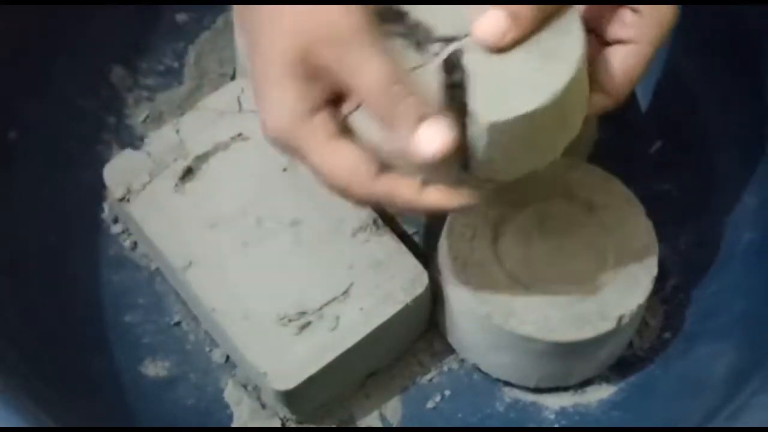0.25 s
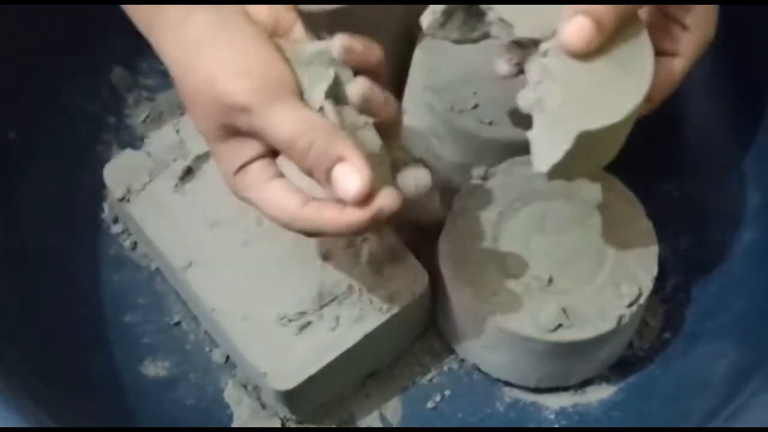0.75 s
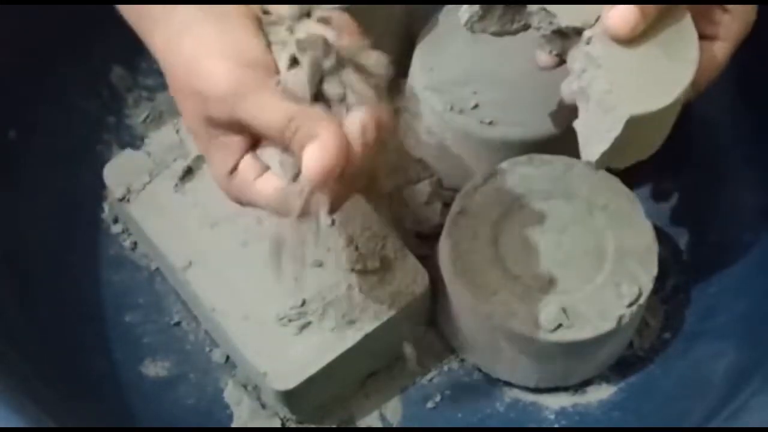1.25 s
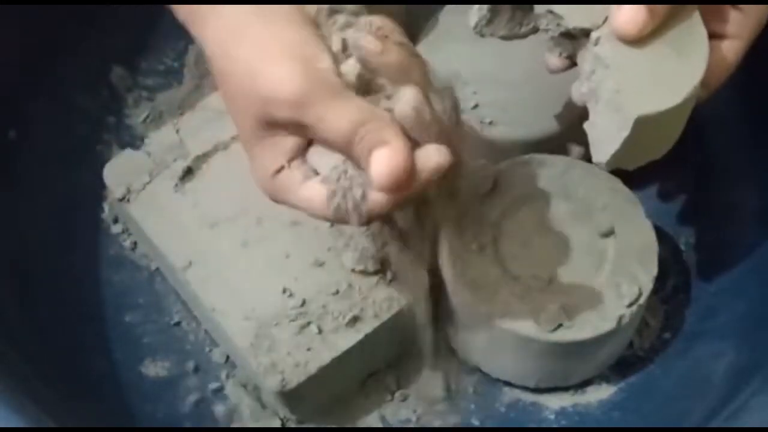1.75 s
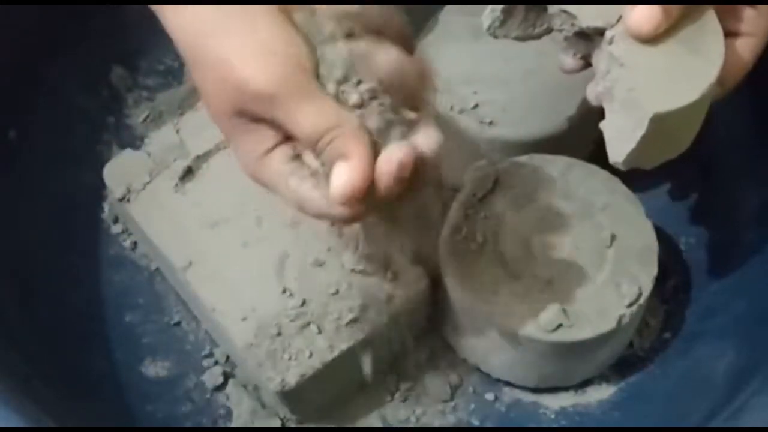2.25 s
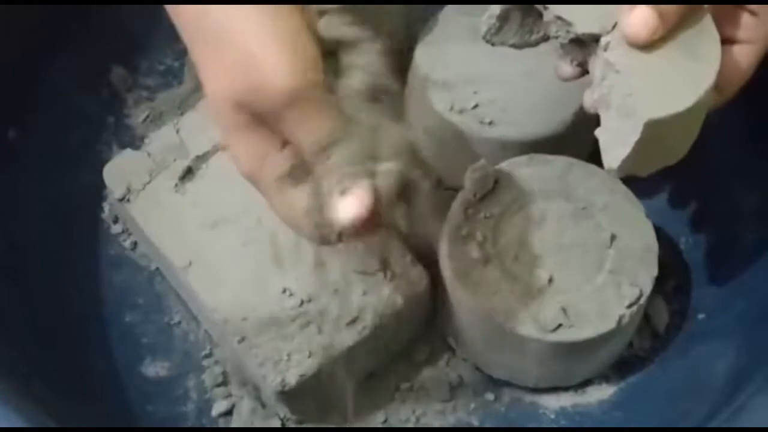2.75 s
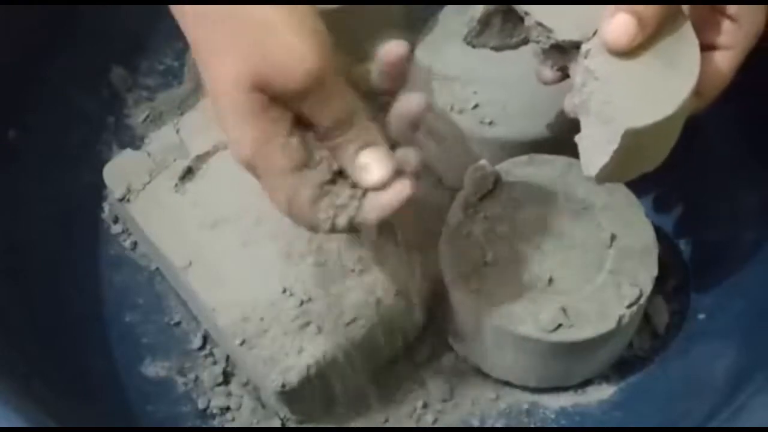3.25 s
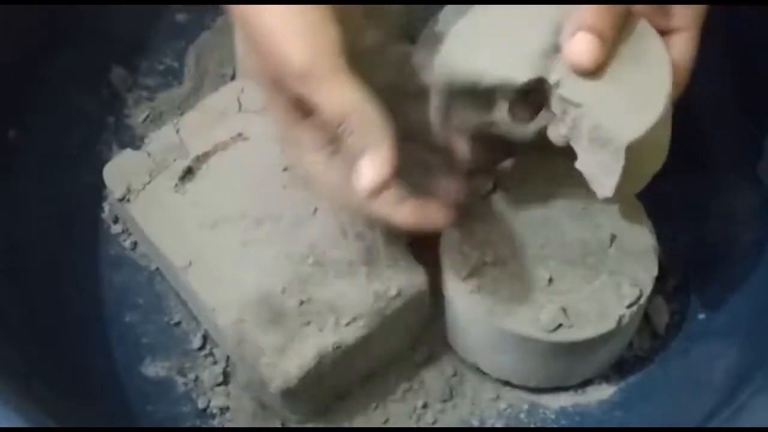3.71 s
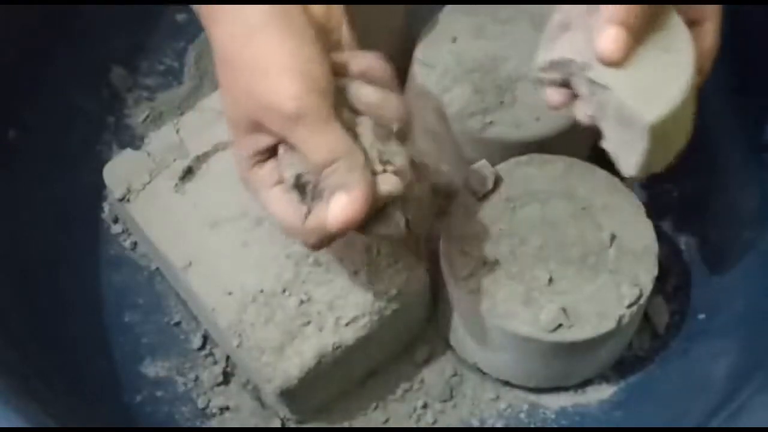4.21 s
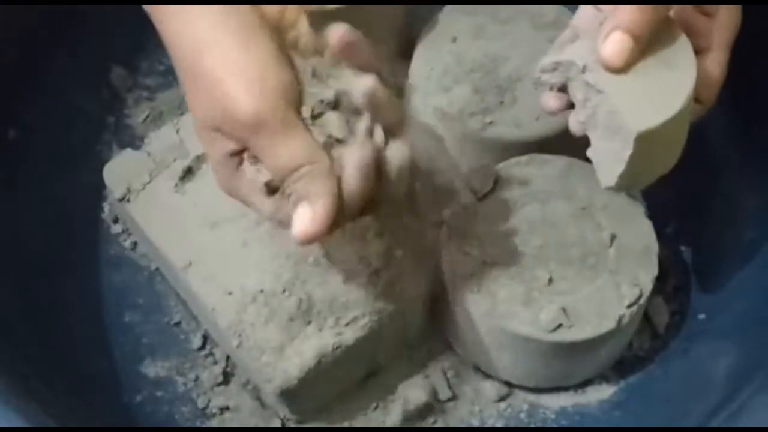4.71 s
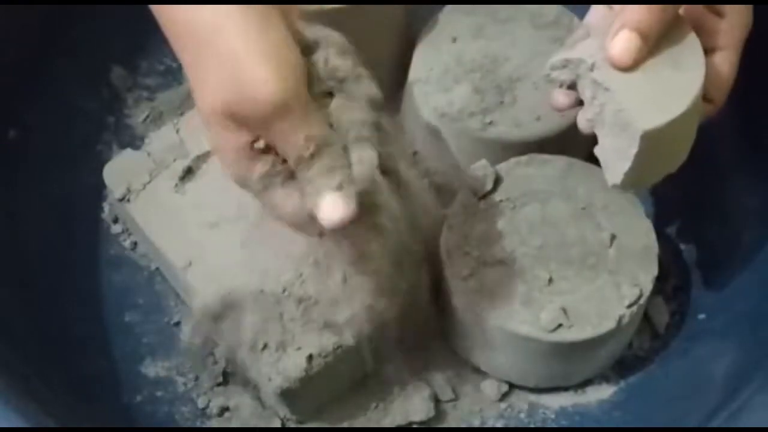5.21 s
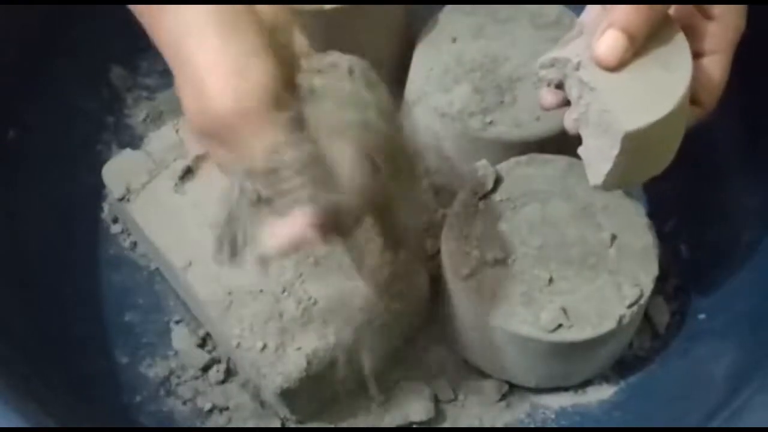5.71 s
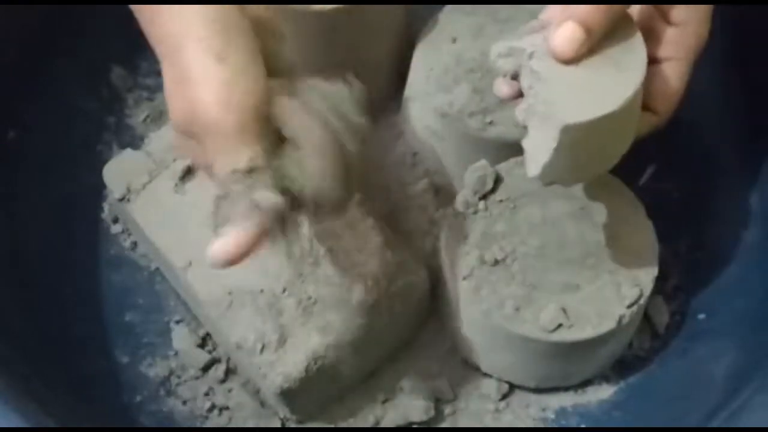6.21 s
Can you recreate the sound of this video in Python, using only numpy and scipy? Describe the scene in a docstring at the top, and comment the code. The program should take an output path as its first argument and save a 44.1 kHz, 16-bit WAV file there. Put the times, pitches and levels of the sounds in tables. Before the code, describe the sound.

Dry, brittle cement crumbles between fingers: short dull snaps, grainy crunches, brief finger rasps and a fine patter of grit. One heavy chunk booms against the tub early on; the strongest crushing follows around two and three seconds, with another burst past five. Heard close, hollow from the tub walls, with a diffuse room tail over soft rumble, wavering hum and faint hiss.

```python
"""Crushing soft cement over a tub

A hand breaks a piece off a soft cement block and crushes it over a plastic tub in a bare, echoing room.
Cracks are damped noise bursts, lumps and the tub's knock are decaying sines, and grit is random clicks.
Short echoes place the cracking between the tub's close walls; a diffuse tail gives the distance of the room.
The microphone also hears the room's low rumble, a wavering hum and a faint hiss."""
import sys
import numpy as np
from scipy import signal
from scipy.fft import rfft, irfft, next_fast_len
from scipy.io import wavfile

SR = 44100
rng = np.random.default_rng(int(sys.argv[2]) if len(sys.argv) > 2 else 0)


def persist_wave(psi):
    """Save psi, clipped to +-1, as 16-bit WAV."""
    counts = np.round(np.clip(psi, -1, 1) * 32767).astype(np.int16)
    wavfile.write(sys.argv[1], SR, np.atleast_2d(counts).T)


N = 284918
TIME = np.arange(N) / SR


def from_db(db):
    """Decibels to gain."""
    return 10 ** (np.asarray(db) / 20)


def rms_one(x):
    """Scale to unit rms."""
    return x / np.sqrt(np.mean(x ** 2) + 1e-20)


def at_hz(points, hz):
    """Read a table of values against frequency on a log-frequency axis."""
    freqs, values = np.transpose(points)
    return np.interp(np.log(np.maximum(hz, 1)), np.log(freqs), values)


def colour(x, spectrum):
    """Give a noise its spectrum; rms 1."""
    size = next_fast_len(N)
    gain = from_db(at_hz(spectrum, np.fft.rfftfreq(size, 1 / SR)))
    shaped = irfft(rfft(x, size) * gain, size)
    return rms_one(shaped[:N])


def band(x, hz, octaves):
    """A band-pass resonance, the more damped the wider it is."""
    half = 2 ** (octaves / 2)
    edges = [hz / half, min(hz * half, SR / 2 - 1000)]
    return signal.sosfilt(signal.butter(2, edges, "band", fs=SR, output="sos"), x)


def add(out, s, sound):
    """Mix a sound in at time s."""
    start = round(s * SR)
    out[start:start + len(sound)] += sound[:N - start]


def grains(per_s, spread_db, size):
    """Random clicks: many small, a few large."""
    born = rng.random(size) < per_s / SR
    sign = rng.choice([-1, 1], size)
    return born * sign * from_db(spread_db * np.minimum(rng.exponential(1, size), 4))


def grit_ticks(per_s, spread_db):
    """Single grains strike the blocks, each at one of five pitches; rms 1."""
    pitches = np.geomspace(1400, 3900, 5)
    return rms_one(sum(band(grains(per_s / 5, spread_db, N), hz, 0.55) for hz in pitches))


def fracture(hz, octaves, splinter, run_s, finer=1.19):
    """A snap, then a dying run of small breaks at finer times its pitch; rms 1 when spread over 5 ms."""
    t = TIME[:SR // 25]
    run = splinter * rms_one(grains(3000, 3.3, len(t))) * np.exp(-t / run_s)
    snap = band(signal.unit_impulse(len(t)), hz, octaves)
    burst = snap + band(run, hz * finer, octaves)
    return burst / np.sqrt(np.sum(burst ** 2) / (SR / 200))


def ring(hz, db, t60, contact_s):
    """A damped mode, swelling over the time the contact lasts."""
    t = TIME[:SR // 4]
    swell = 1 - np.exp(-t / contact_s)
    return from_db(db - 60 * t / t60) * np.sin(2 * np.pi * hz * t) * swell


# low noise of the room: (frequency [Hz], relative density [dB per Hz])
RUMBLE_SPECTRUM = [(20, -26), (45, -28), (72, -31.5), (90, -5), (170, -1.5), (350, -7.5), (480, -6.5),
                   (580, -16.5), (750, -12), (1200, -22.5), (3000, -54.5)]
# faint hiss: (frequency [Hz], relative density [dB per Hz])
HISS_SPECTRUM = [(3000, -7), (7500, 0), (11300, -9.5), (11900, 8.5), (15500, 3.5)]


def background(rumble_db=-51, hum_db=-61, hum_hz=74, hiss_db=-83):
    """Shaped noise for rumble and hiss; a narrow band of noise makes the hum waver."""
    rumble, hum, hiss = rng.standard_normal((3, N))
    low_noise = from_db(rumble_db) * colour(rumble, RUMBLE_SPECTRUM)
    wavering_hum = from_db(hum_db) * rms_one(band(hum, hum_hz, 0.25))
    return low_noise + wavering_hum + from_db(hiss_db) * colour(hiss, HISS_SPECTRUM)


# the hand's effort, before the shares and trims below:
# (time [s], level of the crunch [dB], level of the sand it frees [dB])
HAND_EFFORT = [(0.0, -66, -63), (0.36, -65, -59.5), (0.75, -58, -60.5), (1.06, -62, -60), (1.35, -61, -61),
               (1.69, -48, -54), (1.76, -48, -60), (2.09, -58, -60.5), (2.43, -61, -59), (2.73, -54, -62.5),
               (2.82, -52.5, -54), (3.07, -54.5, -58), (3.42, -61, -58), (4.03, -66, -61.5),
               (4.68, -62, -59.5), (5.2, -62, -59.5), (5.36, -52, -57), (5.52, -59, -60.5),
               (5.76, -60, -61.5), (5.99, -61, -59), (6.24, -64, -60.5), (6.46, -65, -60)]
# crumbs between the fingers: (frequency [Hz], relative density [dB per Hz])
CRUNCH_SPECTRUM = [(100, 6), (200, 11), (450, 18), (700, 16.5), (1100, -0.5), (2000, 9), (2700, -14),
                   (5000, -45.5)]
# sand running off: (frequency [Hz], relative density [dB per Hz])
SAND_SPECTRUM = [(1000, 1), (2300, -1.5), (3000, 4.5), (3900, 8.5), (4700, -4), (5300, -10), (6500, -2),
                 (9000, -29.5)]
CRUNCH_FOLLOWS = .7   # share of the effort's dB swing that reaches the crumbs


def trickle(crunch_db=4.0, sand_db=0, tick_db=-9):
    """Crumbs grind between the fingers, sand runs off and single grains tick; more flow brings more grains."""
    s, effort_db, flow_db = np.transpose(HAND_EFFORT)
    crunch_curve_db = effort_db.mean() + CRUNCH_FOLLOWS * (effort_db - effort_db.mean())
    crunch = from_db(np.interp(TIME, s, crunch_curve_db))
    sand = from_db(np.interp(TIME, s, flow_db))
    crumbs = colour(grains(900 * rms_one(crunch), 3.1, N), CRUNCH_SPECTRUM)
    dust = colour(grains(3500 * rms_one(sand), 1.5, N), SAND_SPECTRUM)
    ticks = grit_ticks(50 * rms_one(sand), spread_db=4.5)
    return from_db(crunch_db) * crunch * crumbs + sand * (from_db(sand_db) * dust + from_db(tick_db) * ticks)


CHIPS_PER_S = 20   # rate at the rms effort
CHIP_DB, CHIP_SPREAD_DB = 7.5, 3   # level above the mean effort, and its random spread
CHIP_LOW_HZ, CHIP_HIGH_HZ, CHIP_OCTAVES = 1380, 3400, 1.56   # range of pitch, and width
CHIP_FOLLOWS = 0.74   # share of the effort's dB swing that reaches their level


def chips():
    """Small pieces snap at random, more often and louder the harder the hand kneads."""
    times, crunch_db, _ = np.transpose(HAND_EFFORT)
    effort_db = np.interp(TIME, times, crunch_db)
    size_db = effort_db.mean() + CHIP_DB + CHIP_FOLLOWS * (effort_db - effort_db.mean())
    due = np.cumsum(CHIPS_PER_S * rms_one(from_db(effort_db))) / SR   # chips expected so far
    out = np.zeros(N)
    for k in range(int(due[-1])):
        at = np.searchsorted(due, k + rng.random())
        db = size_db[at] + CHIP_SPREAD_DB * rng.standard_normal()
        hz = rng.uniform(CHIP_LOW_HZ, CHIP_HIGH_HZ)
        add(out, at / SR, from_db(db) * fracture(hz, CHIP_OCTAVES, splinter=0.092, run_s=0.0022))
    return out


# fingers rasping over crumbs: (time of the peak [s], level [dB], half length [s])
FINGER_RASPS = [(0.121, -55, 0.02), (2.642, -46, .03), (3.413, -49, 0.017), (3.565, -56.5, 0.058),
                (3.762, -52.5, 0.037), (4.216, -53, .022), (5.928, -50, 0.021), (6.09, -48, 0.0081)]
RASP_HZ = 2940


def rasps(level_db=0):
    """A slipping finger drags a short swell of uneven grains."""
    out = np.zeros(N)
    for s, db, half_s in FINGER_RASPS:
        swell = np.hanning(max(round(2 * half_s * SR), 10))
        grit = rms_one(band(grains(1500, 3.5, len(swell)), RASP_HZ, octaves=1.5))
        add(out, s - half_s, from_db(db + level_db) * swell * grit)
    return out


# cement cracking in the fist, levels before the trims in cracks() and width before its lower limit:
# (time [s], body level [dB], body centre [Hz], body width [octaves], gritty edge level [dB])
CEMENT_CRACKS = [(0.376, -41.5, 420.0, 2.4, -41), (0.4446, -38.5, 629, 1.0, -49.5),
                 (0.4553, -44, 620.0, 0.7, -60.5), (0.4884, -37, 738, 0.9, -60.5),
                 (0.6254, -28.5, 420.0, 1.66, -54.5), (0.648, -45.5, 920.0, 3.1, -43),
                 (0.7151, -33.0, 650.0, 0.92, -57.5), (0.7499, -42.5, 2300.0, 1.6, -38),
                 (1.2611, -28.5, 604, 1.38, -57.5), (1.3906, -36.5, 1420.0, 0.9, -48),
                 (1.4202, -40.5, 740.0, 1.0, -44.5), (1.5075, -31.5, 1000.0, 2.5, -44),
                 (1.5188, -30.0, 1460, 1.07, -38.5), (1.5558, -39, 970.0, 1.1, -59),
                 (1.5984, -30.0, 710.0, 1.0, -42), (1.6204, -32.5, 1300.0, 1.3, -48.5),
                 (1.63, -29.5, 1100.0, 1.7, -39), (1.6935, -22.5, 1770, 0.92, -36.5),
                 (1.7178, -33, 650.0, 0.61, -58), (1.759, -38.5, 590.0, 0.72, -57),
                 (1.784, -20.5, 1200, 2.37, -40), (1.801, -12.0, 938, 1.11, -38),
                 (1.8799, -35, 765, 0.7, -57), (2.3586, -40, 770.0, 3.1, -38),
                 (2.403, -39.5, 960.0, 1.6, -54), (2.4621, -42.0, 1770.0, 0.56, -50),
                 (2.5436, -37.0, 770.0, 2.7, -47), (2.5767, -39, 1310.0, 1.4, -59),
                 (2.61, -27.5, 405, 2.1, -46.5), (2.625, -26, 534, 0.91, -41),
                 (2.7086, -30, 1300.0, 1.6, -38), (2.8131, -21.5, 860, 2, -49),
                 (2.837, -24, 1600, 0.49, -46.0), (2.848, -25, 1460, 1.2, -36.5),
                 (2.9111, -29.5, 1130, 1.96, -46), (2.9557, -40, 2300.0, 0.76, -39.5),
                 (2.9976, -41.5, 840.0, 2.2, -44), (3.0385, -35.5, 1200.0, 1.9, -41.5),
                 (3.1614, -36.5, 1520, 1.3, -52), (3.236, -41.5, 880.0, 2.6, -56),
                 (3.379, -44.5, 1350, 1.6, -57.5), (3.7695, -39.5, 1160, 2.9, -43.0),
                 (4.228, -43, 810.0, 1.9, -47), (4.6094, -37, 420.0, 2.4, -46.5),
                 (4.7066, -36, 770.0, 1.1, -41.5), (4.8221, -37, 425, 2.4, -56),
                 (4.831, -43.5, 2010, 0.3, -44), (4.937, -42, 740.0, 2.8, -64),
                 (5.178, -33, 2210, 1.7, -51), (5.1946, -30.5, 570.0, 1.04, -43),
                 (5.238, -32.5, 1240, 1.57, -40.5), (5.2603, -27.5, 1730, 0.95, -39),
                 (5.2824, -32, 573, 3.1, -50.5), (5.3044, -30.5, 637, 1.4, -42.5),
                 (5.3141, -34.5, 660.0, 0.69, -54), (5.335, -22.5, 617, 2.4, -48),
                 (5.3393, -24, 820, 2.7, -47.5), (5.3772, -30, 1490.0, 1.1, -44),
                 (5.3857, -30.5, 2300.0, 0.66, -36.5), (5.4054, -36.5, 600.0, 0.85, -33),
                 (5.4216, -35.5, 1990, 0.7, -39.5), (5.437, -33.5, 1140.0, 0.85, -47.5),
                 (5.4453, -28.5, 436, 0.62, -51), (5.6735, -41, 920.0, 2.3, -48.5),
                 (5.6913, -43, 2020.0, 0.7, -35), (5.7494, -43.5, 1060.0, 1.9, -50),
                 (5.8892, -33.5, 650.0, 2.5, -59), (6.0112, -34.5, 810.0, 1.2, -46.5),
                 (6.0638, -40.5, 2290, 2, -39)]
NARROWEST_OCTAVES = .9   # soft cement is too damped to ring on a pitch


def cracks(body_db=0, edge_db=-2.0, edge_hz=3750):
    """Each break sounds the fragment at its own pitch and sheds a bright spray of grit."""
    out = np.zeros(N)
    for s, db, hz, octaves, grit_db in CEMENT_CRACKS:
        width = max(octaves, NARROWEST_OCTAVES)
        body = fracture(hz, width, splinter=.11, run_s=.0038, finer=1.02)
        edge = fracture(edge_hz, octaves=0.41, splinter=0.71, run_s=0.0011, finer=0.98)
        add(out, s, from_db(db + body_db) * body)
        add(out, s, from_db(grit_db + edge_db) * edge)
    return out


def debris(cracking, fall_s=.06, per_s=350, level_db=-63.0):
    """Every break frees a shower of crumbs, which patter down just after it."""
    keep = np.exp(-1 / (fall_s * SR))
    energy = signal.lfilter([1 - keep], [1, -keep], cracking ** 2 + 1e-18)
    shower = rms_one(energy ** .25)   # square root of the smoothed amplitude
    return from_db(level_db) * shower * grit_ticks(per_s * shower, spread_db=3.5)


# lumps landing on the blocks and the tub floor: (time [s], level [dB], ring [Hz], t60 [s])
FALLING_LUMPS = [(0.379, -34.5, 131, .09), (0.531, -27.5, 158, 0.027), (0.624, -25, 373, 0.027),
                 (1.498, -26, 202, .035), (1.621, -23, 222, .035), (1.7019, -15.5, 199, .032),
                 (1.722, -31.5, 135, 0.089), (1.801, -22, 239, 0.036), (1.879, -21.5, 784, 0.049),
                 (2.158, -31, 200, 0.057), (2.358, -25, 129, 0.063), (2.443, -22.5, 150, .015),
                 (2.624, -23, 178, .075), (2.815, -36, 308, 0.035), (5.195, -30.5, 691, .07),
                 (5.284, -28, 197, .07), (5.334, -18.5, 248, 0.014), (5.444, -27.5, 211, 0.084),
                 (5.89, -28, 295, 0.015)]


def lumps():
    """Each falling lump lands with a single mode that rings briefly."""
    out = np.zeros(N)
    for s, db, hz, t60 in FALLING_LUMPS:
        add(out, s, ring(hz, db, t60, contact_s=0.00014))
    return out


KNOCK_S = .7946   # time the heavy chunk strikes
# the tub's modes under the chunk: (frequency [Hz], level [dB], t60 [s])
KNOCKED_TUB_MODES = [(145, -47, 0.095), (244, -19, 0.064), (340, -1, 0.023), (386, -11, 0.044),
                     (694, -4.5, 0.022), (898, -7, 0.01), (1630, -24.5, 0.021), (3580, -27, .012)]


def knock(give_db=-30, lead_s=0.0042):
    """The heavy chunk gives way with a short crunch, and the tub booms in its damped modes."""
    out = np.zeros(N)
    crunch = fracture(hz=910, octaves=2.2, splinter=0.089, run_s=0.0029)
    add(out, KNOCK_S - lead_s, from_db(give_db) * crunch)
    for hz, db, t60 in KNOCKED_TUB_MODES:
        add(out, KNOCK_S, ring(hz, db, t60, contact_s=0.00081))
    return out


# echoes between the tub's walls: (delay [s], gain [ratio])
WALL_ECHOES = [(.0031, 0.14), (.0043, 0.14), (.0053, -0.072), (.0062, .13), (.0088, 0.034)]


def tub(x):
    """Close walls send each crack back within milliseconds and make it hollow."""
    return x + sum(gain * np.interp(TIME - delay, TIME, x, left=0) for delay, gain in WALL_ECHOES)


def low_cut(x, hz=108):
    """Small bodies radiate little deep bass."""
    return signal.sosfilt(signal.butter(3, hz, "high", fs=SR, output="sos"), x)


# hollow resonances of the tub: (frequency [Hz], width [Hz], level [dB])
TUB_HOLLOW = [(350, 320, -5.5), (687, 42, -4.5)]


def tub_air(x):
    """The hollow of the tub adds resonant peaks to what leaves it for the room."""
    return x + sum(from_db(db) * signal.lfilter(*signal.iirpeak(hz, hz / width, SR), x)
                   for hz, width, db in TUB_HOLLOW)


# decay of the room: (frequency [Hz], t60 [s])
ROOM_DECAY = [(100, 3.5), (350, 1.2), (800, 1.3), (2000, 1.0), (5000, 1.1)]
# strength of the room's echo: (frequency [Hz], level [dB])
ROOM_STRENGTH = [(100, -5), (200, -10.5), (370, -12.5), (550, -16), (800, -16), (1500, -18), (4000, -24.5)]


def room(x, build_s=0.018):
    """A diffuse tail of noise bands that builds up and dies away, longest in the bass."""
    t, response = TIME[:3 * SR // 2], 0
    for hz in 90 * 2 ** (np.arange(14) / 2):   # half-octave bands
        decay = from_db(-60 * t / at_hz(ROOM_DECAY, hz))
        tail = band(rng.standard_normal(len(t)), hz, 0.5) * decay * (1 - np.exp(-t / build_s))
        share = hz / np.sqrt(2) / SR   # this band's part of a click's energy
        response = response + from_db(at_hz(ROOM_STRENGTH, hz)) * tail * np.sqrt(share / np.sum(tail ** 2))
    return signal.fftconvolve(x, response)[:N]


def dull(x, shelf_hz=4800, shelf_db=-11, top_hz=6800, top_db=-28):
    """The treble falls off in two steep steps."""
    low = signal.sosfiltfilt(signal.butter(20, shelf_hz, fs=SR, output="sos"), x)
    high = signal.sosfiltfilt(signal.butter(10, top_hz, fs=SR, output="sos"), x - low)
    return low + from_db(shelf_db) * high + from_db(top_db) * (x - low - high)


def scene():
    """Cement in the tub, the tub in the room, and the room's own noise."""
    cracking = cracks()
    handled = cracking + debris(cracking) + chips() + rasps() + trickle()
    cement = low_cut(tub(handled) + lumps() + knock())
    heard = dull(cement + room(tub_air(cement)))
    return (heard + background())[None]


CUTOFF_HZ = 15700


def record(dry):
    """A steep elliptic low-pass cuts the top."""
    return signal.sosfilt(signal.ellip(10, .1, 70, CUTOFF_HZ, fs=SR, output="sos"), dry)


dry = scene()
out = record(dry)
persist_wave(out)
```